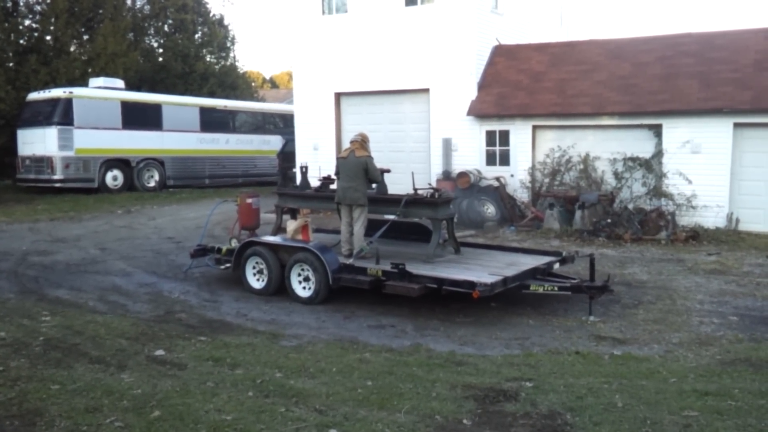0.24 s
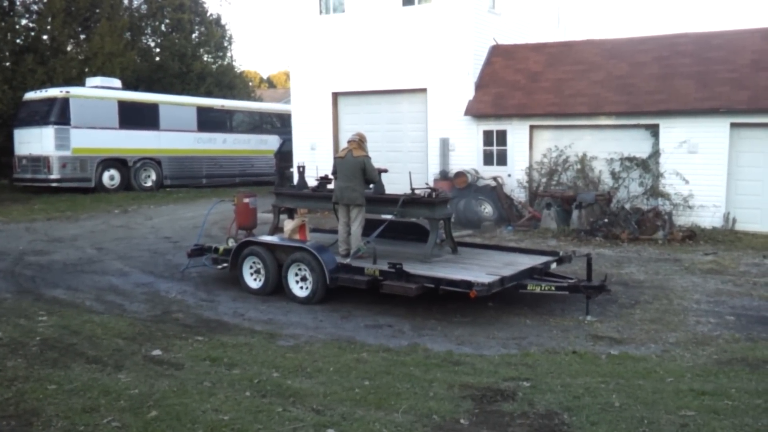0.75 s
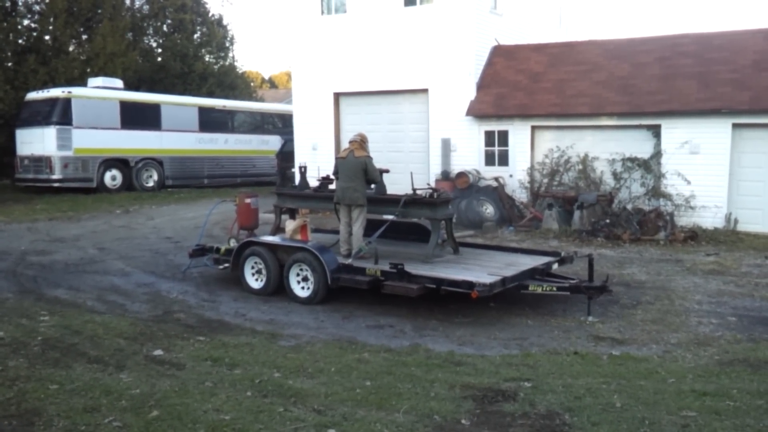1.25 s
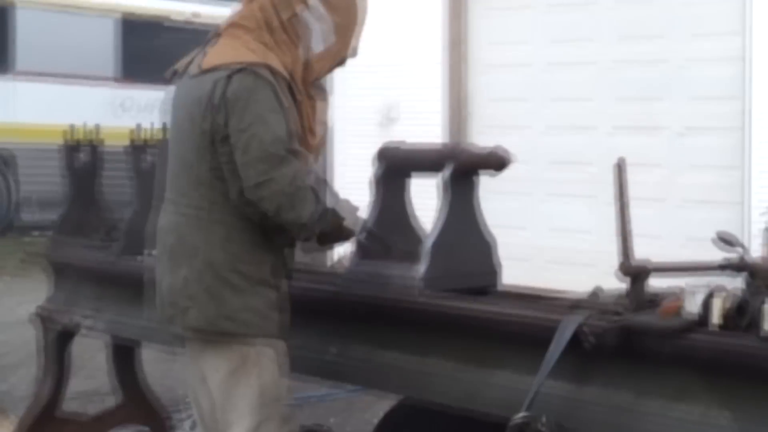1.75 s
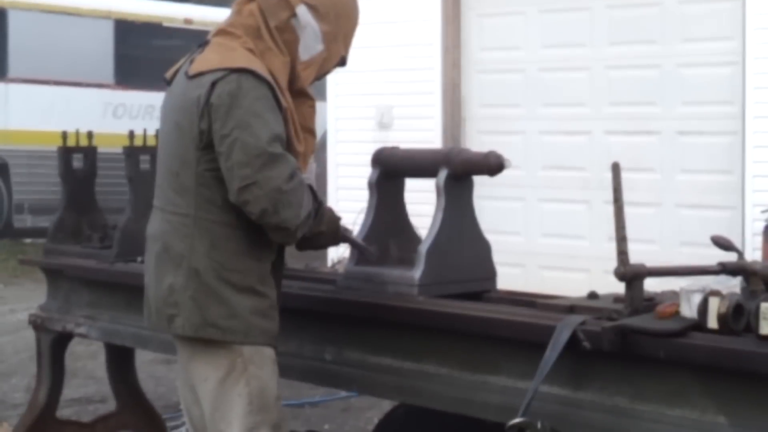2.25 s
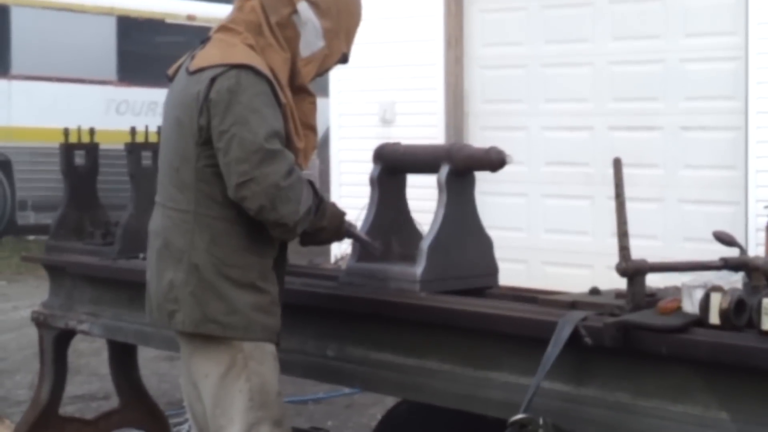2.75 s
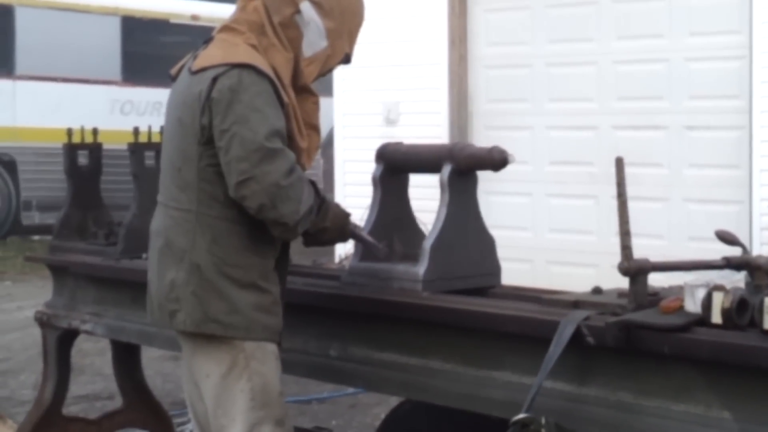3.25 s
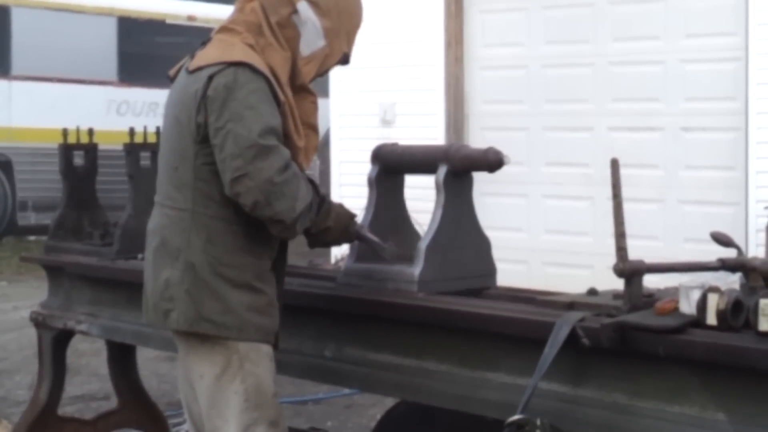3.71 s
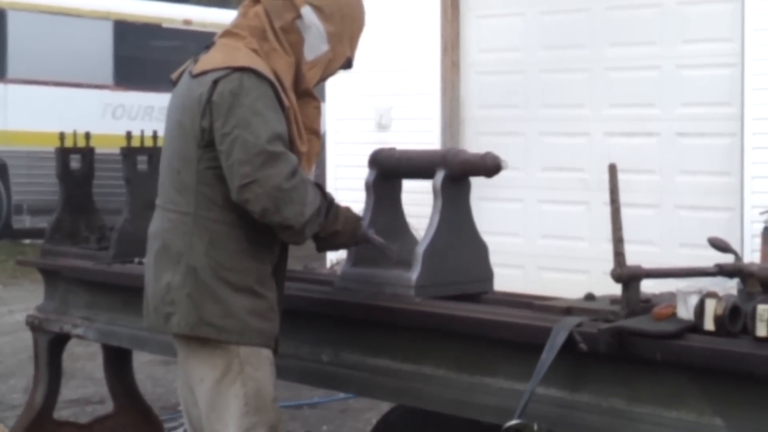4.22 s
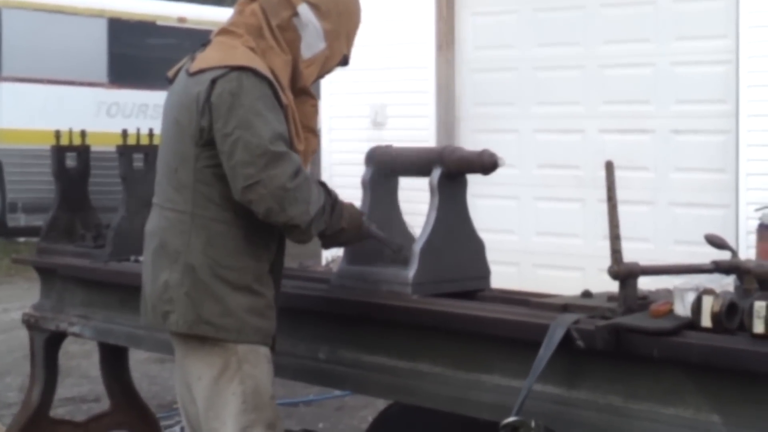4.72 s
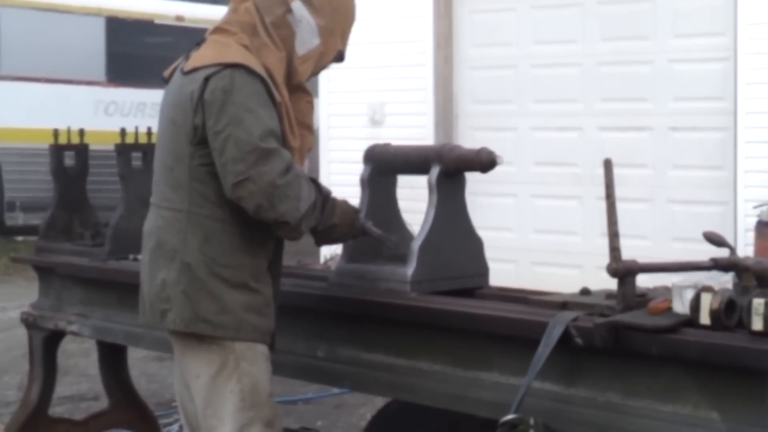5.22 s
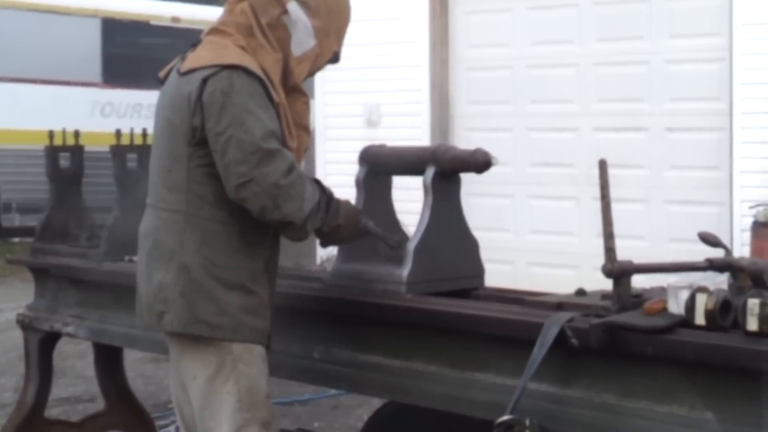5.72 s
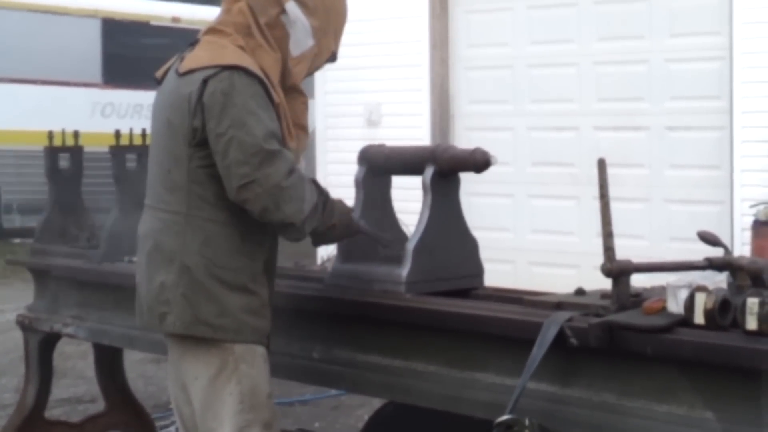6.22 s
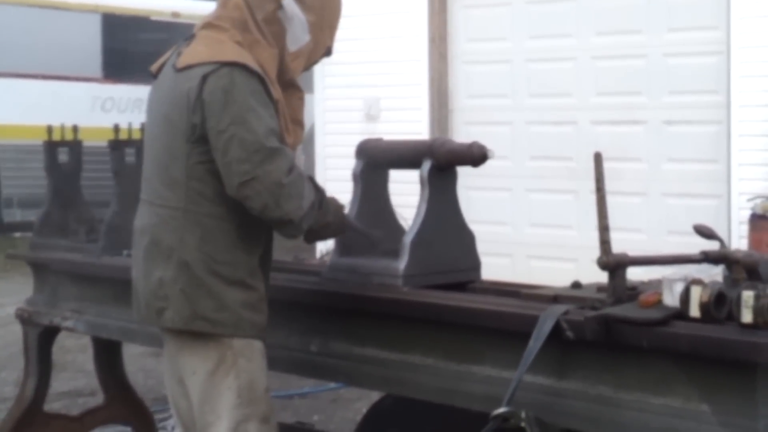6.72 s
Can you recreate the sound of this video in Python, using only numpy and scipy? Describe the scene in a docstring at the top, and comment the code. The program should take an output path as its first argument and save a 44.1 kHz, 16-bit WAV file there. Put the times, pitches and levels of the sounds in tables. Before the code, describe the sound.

A steady sandblasting hiss and a compressor's engine drone are heard at a distance in a yard, with a few soft handling bumps. Soon the sound changes to a close position without the compressor: a loud, slightly distorted jet of air and sand splashing off iron. Breathy, whistling resonances change pitch as the nozzle passes over gaps in the casting, and the blasting continues without a pause.

```python
"""A walled yard, one microphone: a sandblaster is played over the iron bed of an old lathe.
From across the yard the jet hisses over the drone of the air compressor, and fingers knock on the camera.
Then a close position fades in, so loud that it overloads the microphone. Air and sand splash off the iron
and ring in the gaps of the casting, at pitches that shift with the nozzle.
The camera samples at only 16 kHz, which leaves a weak mirror image of the treble above 8 kHz."""
import sys
import numpy as np
from scipy import signal
from scipy.fft import rfft, irfft, next_fast_len
from scipy.io import wavfile

SR = 44100
rng = np.random.default_rng(int(sys.argv[2]) if len(sys.argv) > 2 else 0)


def generate_wav(signal):
    """Clip the signal to [-1, 1] and save it as 16-bit WAV at the path in sys.argv[1]."""
    frames = np.transpose(np.atleast_2d(signal))
    scaled = np.clip(frames, -1, 1) * 32767
    pcm = np.round(scaled).astype(np.int16)
    wavfile.write(sys.argv[1], SR, pcm)


N = 306936

# hiss of the jet, close up: f/Hz, relative density/dB
CLOSE_HISS = [(1000, -31), (1700, -17.5), (2020, -12.5), (3240, -12), (3750, -8), (4230, -2.5), (5780, 1),
              (6780, -5), (7800, -24.5), (10100, -63), (17200, -120)]
# air splashing off the iron: t/s, level/dB
SPLASH_LEVEL = [(2.1, -38), (2.8, -42.5), (3.15, -36), (3.65, -38.5), (3.85, -31.5), (4.05, -36.5),
                (5.0, -37), (6.96, -40)]
# spectrum of that splash: f/Hz, relative density/dB
SPLASH = [(30, -8), (150, -14.5), (450, -7.5), (800, 3), (1300, 3.5), (1900, -6.0), (3000, -24)]
# the main ring, as the nozzle is drawn along the foot of the casting: t/s, f/Hz, level/dB
MAIN_RING = [(1.6, 5460, -18), (1.8, 5504, -24.5), (1.95, 5950, -21.5), (2.25, 5900, -23.5),
             (2.45, 5877, -18), (2.95, 5717, -19), (3.5, 5548, -21), (3.72, 5200, -20.5), (4.15, 5233, -20)]
# air resonances in each part of the casting: f/Hz, width/Hz, level/dB
CAVITY_MODES = { "face": [(3340, 200, -40), (4080, 260, -29.5), (4700, 350, -28.5), (6700, 360, -26.5)],
                "ledge": [(2508, 290, -37.5), (4156, 250, -26.5), (6600, 360, -26.5)],
                "slot": [(3464, 190, -29.5), (4427, 260, -22.5), (5300, 300, -25), (5800, 450, -25),
                (7100, 300, -33)], "groove": [(2534, 240, -36), (3515, 200, -40), (4330, 230, -24),
                (4980, 150, -22.5), (5900, 500, -28), (6750, 300, -26.5)], "corner": [(2730, 310, -31.5),
                (3510, 230, -37.5), (4520, 450, -20), (5005, 250, -27), (5640, 400, -21)]}
# where the nozzle dwells: start t/s, end t/s, level/dB, part
DWELLS = [(1.5, 2.947, 0, "face"), (2.95, 3.55, 0, "ledge"), (3.548, 4.2, 0.5, "ledge"),
          (4.22, 4.58, 0.5, "slot"), (4.64, 5.1, -1, "groove"), (5.1, 5.517, -1.5, "slot"),
          (5.52, 6.22, 0, "groove"), (6.236, 7.1, -0.5, "corner")]
# brief dips in the close sound: t/s, change/dB, length/s
DIPS = [(3.793, -0.5, .019), (4.67, -0.8, .026), (4.9, -1.8, 0.018), (5.703, -0.2, .018),
        (5.945, -1.8, .018), (6.192, -1.2, .018), (6.44, -1.0, .054)]
# hiss of the jet from across the yard: f/Hz, relative density/dB
FAR_HISS = [(650, -44), (1100, -17), (1270, -15.5), (1470, -18), (1900, -14), (2290, -12), (2590, -10.5),
            (2760, -11.5), (3300, -7.5), (3610, -9), (3980, -4.5), (4350, -6.5), (5380, -4.5), (6540, -9),
            (7700, -29.5), (10000, -70), (16900, -120)]
# its resonances at that distance: f/Hz, width/Hz, level/dB
FAR_RINGS = [(1921, 250, -39), (3330, 160, -32.5), (3926, 150, -34), (5160, 450, -31)]
# roar of the compressor's engine and fan: f/Hz, relative density/dB
COMPRESSOR_ROAR = [(21, -48), (35, -17), (59, -11), (81, -15), (135, -11.5), (254, -9), (400, -18),
                   (491, -17), (515, -13.5), (593, -6), (838, -5.5), (921, -0.5), (1130, -13.5),
                   (1260, -10), (1500, -14.5), (1950, -45), (3300, -120)]
# the compressor's running tones: f/Hz, level/dB
COMPRESSOR_TONES = [(59.2, -55), (145.3, -51), (263.8, -56), (608.3, -50.5), (764.4, -48.5), (925.9, -49),
                    (1012, -43.5)]
# its whine: f/Hz, level/dB
WHINE_TONES = [(925.9, -42.5), (1270, -50)]
# finger knocks on the camera: t/s, strength/dB
KNOCKS = [(0.891, -25), (0.904, -25), (0.933, -22.5), (1.464, -26)]
# modes of the camera body: f/Hz, gain/dB, t60/s
BODY_MODES = [(115, -14, .05), (215, -6.5, .06), (283, -8, 0.054), (450, -7, .015)]
# the camera's weak smoothing filter: f/Hz, gain/dB
SMOOTHING = [(5000, 0), (6200, 0.3), (7000, -2.5), (7500, -4.5), (8000, -12.5), (8600, -9.5), (9000, -13.5),
             (9400, -16.5), (10200, -26), (11000, -44.5), (11500, -73)]

CAMERA_RATE_HZ = 16000


def close_jet(hiss_db=-15.5, feed_db=0.21):
    """Close up, air and sand hiss, ring in the casting and splash off it; uneven feed shakes them all."""
    splash_db, = in_time(SPLASH_LEVEL)
    hiss = from_db(hiss_db) * turbulence(CLOSE_HISS)
    splash = from_db(splash_db) * turbulence(SPLASH)
    jet = (hiss + casting() + splash) * from_db(feed_db * drift(30))
    return wall_echo(jet)


def casting(wander_hz=22, flicker_db=1.47):
    """Air rings in whichever part of the iron the nozzle points at, trembling with the hand."""
    tremble_hz = wander_hz * drift(10)
    main_hz, main_db = in_time(MAIN_RING)
    main_gain = from_db(main_db + flicker_db * drift(8)) * dwell(0, 4.2)
    sound = main_gain * resonance(main_hz + tremble_hz, width_hz=330)
    for part, modes in CAVITY_MODES.items():
        aim_power = sum((from_db(db) * dwell(start, end)) ** 2
                        for start, end, db, target in DWELLS if target == part)
        cavity = sum(from_db(db + flicker_db * drift(8.3)) * resonance(hz + tremble_hz, width)
                     for hz, width, db in modes)
        sound = sound + np.sqrt(aim_power) * cavity
    return sound


def dwell(start_s, end_s, move_s=.12):
    """Gain as the nozzle arrives, stays and leaves; equal power through a move of the hand."""
    return np.sqrt(np.clip(np.minimum(seconds() - start_s, end_s - seconds()) / move_s + .5, 0, 1))


def dips():
    """Gain of the close jet: the level dips briefly, now and then."""
    return from_db(sum(db * np.exp(-2 * ((seconds() - s) / length) ** 2) for s, db, length in DIPS))


def far_jet(hiss_db=-24.5, whistle_db=-27, flutter_db=0.38, flicker_db=1.5):
    """From across the yard the jet flutters in the open air; once it catches an edge and whistles."""
    hiss = from_db(hiss_db) * turbulence(FAR_HISS)
    rings = sum(from_db(db + flicker_db * drift(6.6)) * resonance(hz, width)
                for hz, width, db in FAR_RINGS)
    whistle = from_db(whistle_db) * dwell(1.24, 1.29) * resonance(hz=5240, width_hz=410)
    return wall_echo((hiss + rings + whistle) * from_db(flutter_db * drift(25)))


def compressor(roar_db=-33.5, flutter_db=.5, whine_start_s=1.26, swell_s=.1):
    """Engine and fan roar, combed by the echo off the building; tones drone and a whine sets in."""
    roar = turbulence(COMPRESSOR_ROAR) * from_db(roar_db + flutter_db * drift(8))
    roar = wall_echo(roar, delay_s=.0325, echo_db=-8.5)
    swell = np.clip((seconds() - whine_start_s) / swell_s, 0, 1)
    return roar + machine_tones(COMPRESSOR_TONES) + swell * machine_tones(WHINE_TONES)


def machine_tones(rows, waver_db=3.0):
    """Tones of the compressor, each wavering in level and a little in pitch."""
    sound = np.zeros(N)
    for hz, db in rows:
        gain = from_db(db + waver_db * drift(5))
        pitch_hz = hz + 0.95 * np.sqrt(hz / 200) * drift(5.6)
        sound += gain * np.sin(2 * np.pi * np.cumsum(pitch_hz) / SR)
    return sound


def finger_knocks():
    """Handling noise at the microphone: each knock rings the damped modes of the camera body."""
    clicks = np.zeros(N)
    for s, db in KNOCKS:
        clicks[round(s * SR)] = from_db(db)
    return sum(from_db(db) * struck_mode(clicks, hz, t60) for hz, db, t60 in BODY_MODES)


def wall_echo(x, delay_s=.0357, echo_db=-13):
    """Direct sound plus one reflection, by default off the wall behind the lathe."""
    return x + from_db(echo_db) * np.interp(seconds() - delay_s, seconds(), x)


def overload(x, ceiling):
    """Peaks are squashed at the camera's rate, so the distortion folds down into a flat, rough floor."""
    return signal.resample(ceiling * np.tanh(at_camera_rate(x) / ceiling), N)


def turbulence(spectrum):
    """Rushing air: noise shaped by (f/Hz, density/dB) points, below half the camera's rate; rms 1."""
    hz, db = np.transpose(spectrum)
    size = next_fast_len(N)
    bins_hz = np.maximum(np.fft.rfftfreq(size, 1 / SR), 1)
    gain = from_db(np.interp(np.log(bins_hz), np.log(hz), db)) * (bins_hz < CAMERA_RATE_HZ / 2)
    return unit_rms(irfft(rfft(rng.standard_normal(size)) * gain, size)[:N])


def resonance(hz, width_hz):
    """A resonance driven by turbulence; its centre may move; rms 1."""
    lowpass = signal.butter(2, width_hz / 2, fs=SR, output="sos")
    swell = signal.sosfilt(lowpass, rng.standard_normal((2, N)))
    phase = 2 * np.pi * np.cumsum(hz * np.ones(N)) / SR
    return unit_rms(swell[0] * np.cos(phase) + swell[1] * np.sin(phase))


def struck_mode(clicks, hz, t60):
    """Each click starts a sine that dies away by 60 dB in t60 seconds."""
    pole, angle = from_db(-60 / (t60 * SR)), 2 * np.pi * hz / SR
    return signal.lfilter([0, np.sin(angle)], [1, -2 * pole * np.cos(angle), pole ** 2], clicks + 1e-18)


def drift(rate_hz, hop=40, settle=2000):
    """Slow random motion of spread 1 that changes about rate_hz times a second."""
    pole = np.exp(-2 * np.pi * rate_hz * hop / SR)
    noise = rng.standard_normal(N // hop + settle + 2)
    slow = signal.lfilter([1], [1, -2 * pole, pole ** 2], noise)[settle:]
    return np.interp(np.arange(N) / hop, np.arange(len(slow)), unit_rms(slow))


def at_camera_rate(x):
    """The sound at the camera's own sample rate."""
    return signal.resample(x, N * CAMERA_RATE_HZ // SR)


def in_time(rows):
    """The columns of a curve table at every sample."""
    times, *columns = np.transpose(rows)
    return [np.interp(seconds(), times, column) for column in columns]


def seconds():
    """The time of every sample."""
    return np.arange(N) / SR


def from_db(db):
    """Decibels to gain."""
    return 10 ** (np.asarray(db) / 20)


def unit_rms(x):
    """Scale to rms 1."""
    return x / np.sqrt(np.mean(x ** 2) + 1e-20)


def scene(far_end_s=1.87, fade_out_s=0.044, close_start_s=1.51, fade_in_s=0.6):
    """One microphone: the position across the yard gives way to the close, overloaded one."""
    far = far_jet() + compressor() + finger_knocks()
    close = overload(close_jet(), ceiling=0.28) * dips()
    fade_out = np.clip((far_end_s - seconds()) / fade_out_s, 0, 1)
    fade_in = np.clip((seconds() - close_start_s) / fade_in_s, 0, 1) ** 0.69
    return np.tile(fade_out * far + fade_in * close, (2, 1))


def record(dry, cutoff_hz=11330):
    """Sampling mirrors the treble about 8 kHz; a weak filter leaves some of the image; the top is cut."""
    spectrum = np.fft.fft(at_camera_rate(dry[0]))
    hz = np.fft.rfftfreq(N, 1 / SR)
    mirrored = np.resize(spectrum, len(hz)) * N / len(spectrum)
    smoothing = from_db(np.interp(hz, *np.transpose(SMOOTHING)))
    top_cut = signal.ellip(10, .1, 80, cutoff_hz, fs=SR, output="sos")
    sound = signal.sosfilt(top_cut, irfft(mirrored * smoothing, N))
    return np.tile(sound, (2, 1))


dry = scene()
out = record(dry)
generate_wav(out)
```